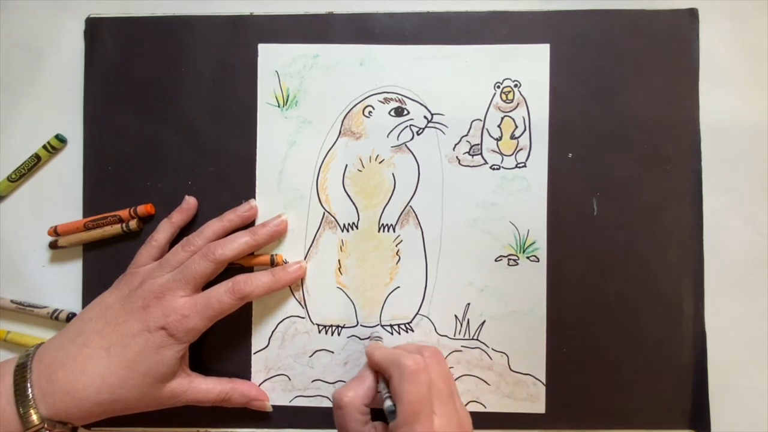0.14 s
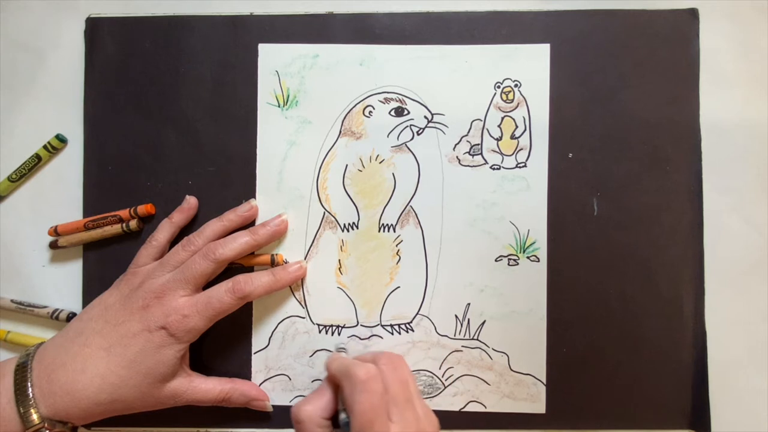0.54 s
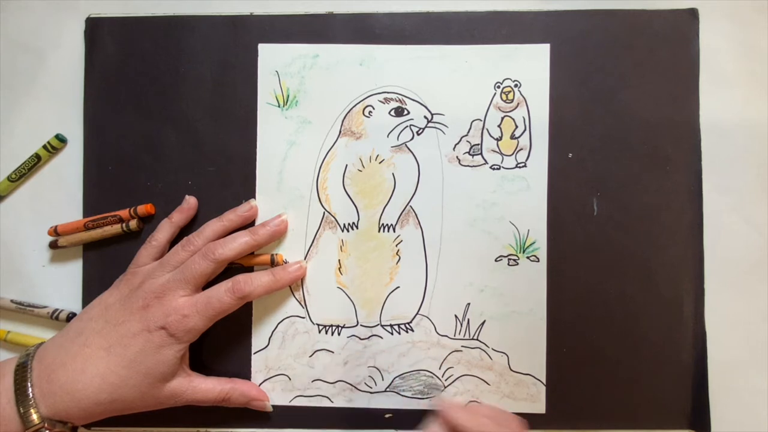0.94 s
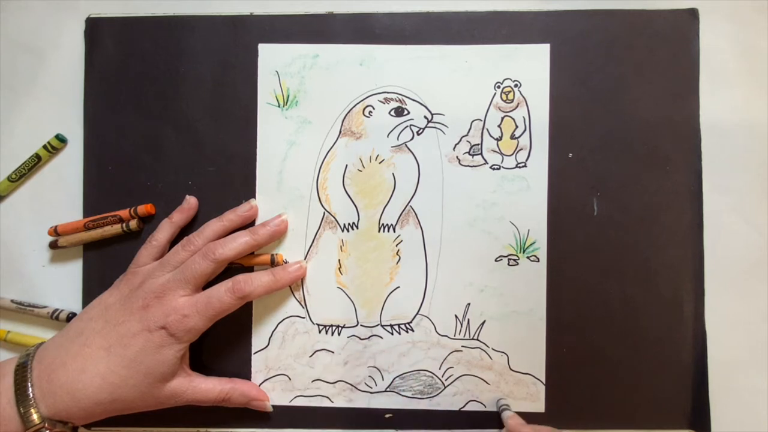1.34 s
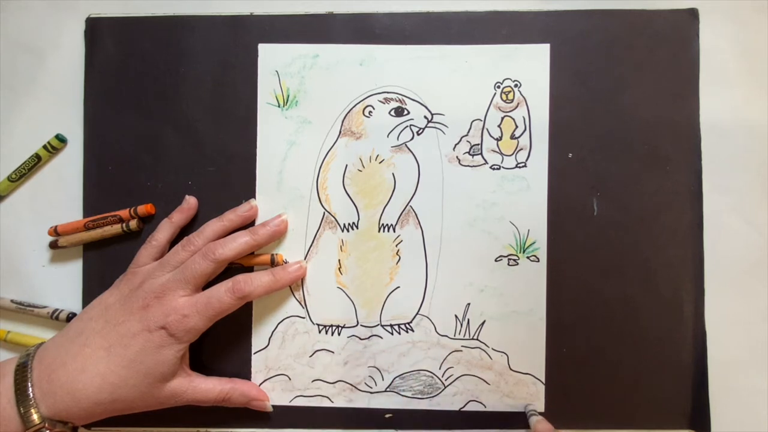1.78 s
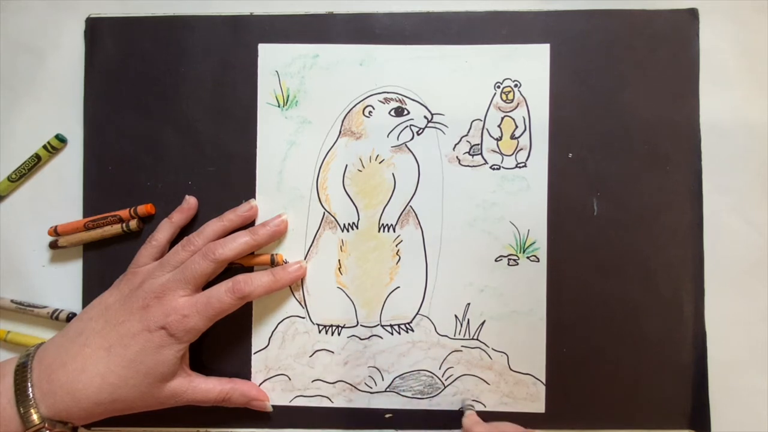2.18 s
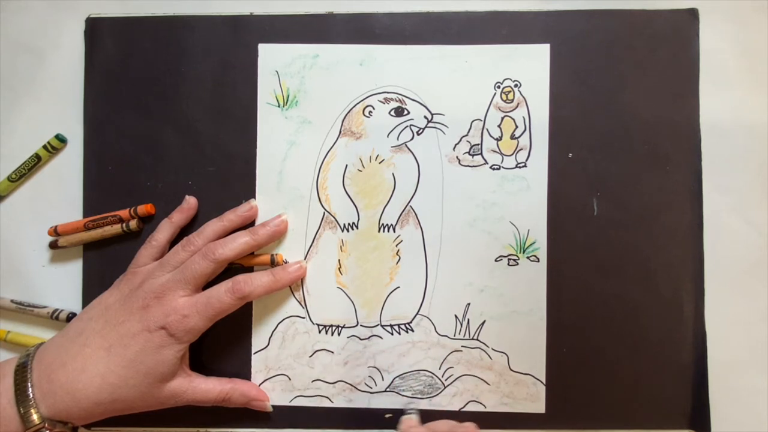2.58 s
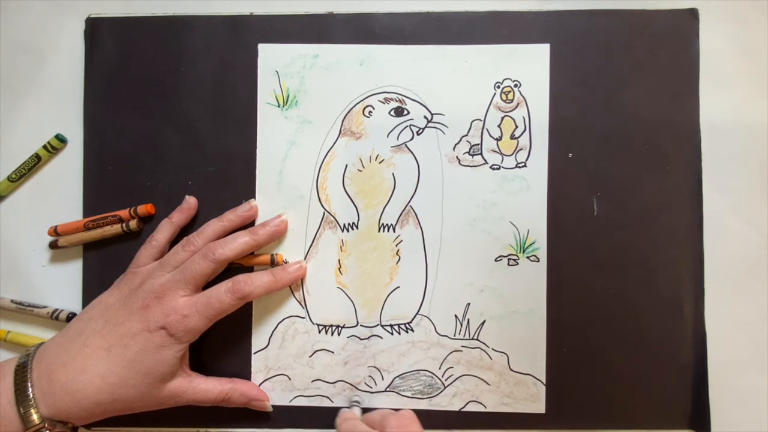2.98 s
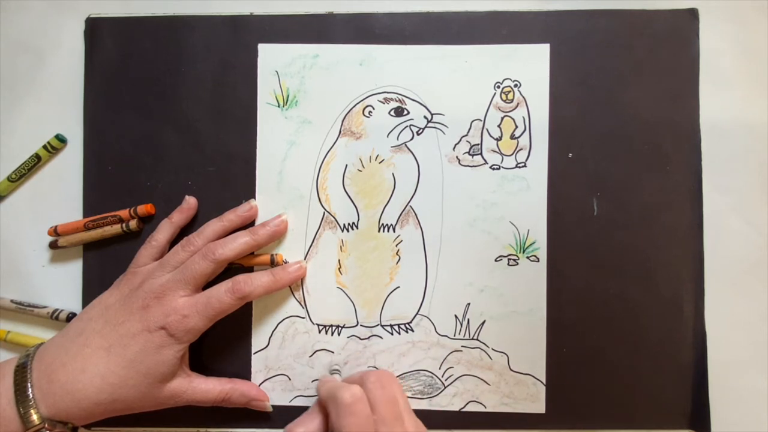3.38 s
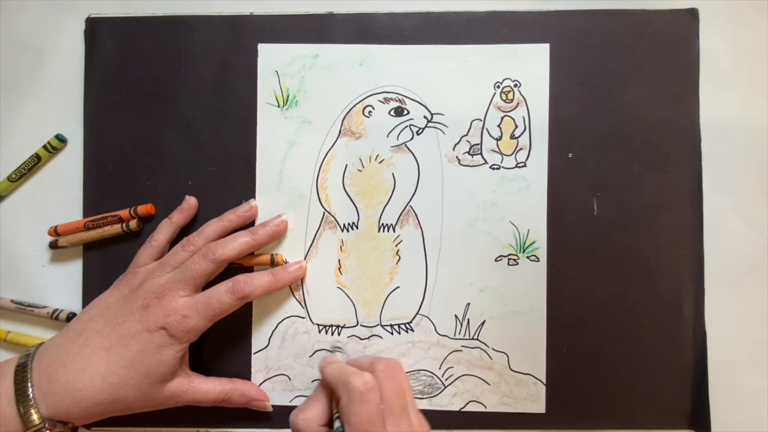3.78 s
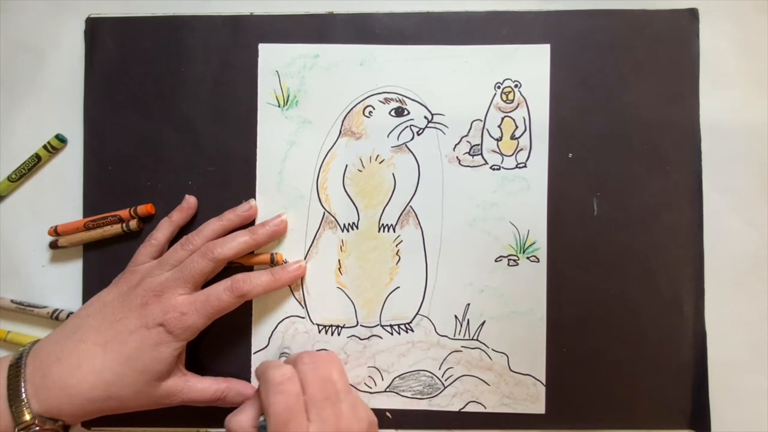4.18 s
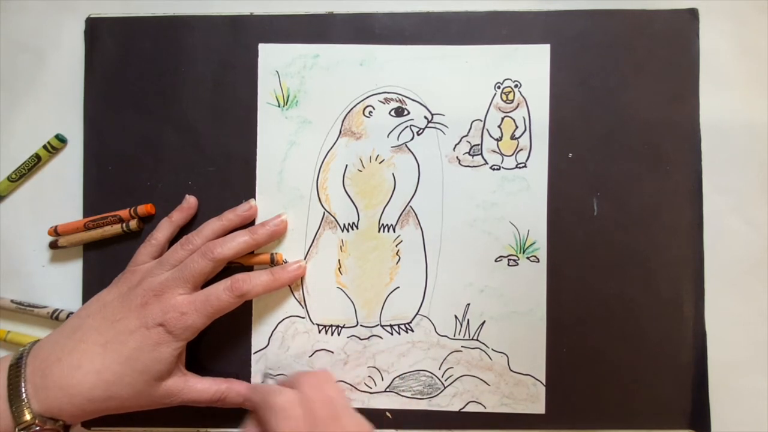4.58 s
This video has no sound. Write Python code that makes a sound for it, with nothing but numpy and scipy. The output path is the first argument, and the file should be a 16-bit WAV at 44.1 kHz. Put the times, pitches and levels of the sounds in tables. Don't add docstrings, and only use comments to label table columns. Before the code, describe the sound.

Close, mono-sounding view of a hand colouring at a wooden table: faint grainy scratching in uneven bursts, the palm's heel sliding thinly on paper, and boomy muffled thumps as tip and knuckles land. The microphone stand wobbles with very deep rumble. Strokes thin out near one second, then run almost continuously, with a crisp tick just after four seconds over quiet room tone and faint lamp buzz.

```python
import sys
import numpy as np
from scipy import signal
from scipy.fft import rfft, irfft
from scipy.io import wavfile

SR = 44100
rng = np.random.default_rng(int(sys.argv[2]) if len(sys.argv) > 2 else 0)


def persist_wave(psi):
    counts = np.round(np.clip(psi, -1, 1) * 32767).astype(np.int16)
    wavfile.write(sys.argv[1], SR, np.atleast_2d(counts).T)


def volts_from_db(level):
    exponent = np.asarray(level, float) / 20
    return 10 ** exponent


N = 208989

# (time [s], board level [dB], frame level [dB], knock level [dB])
THUD_EVENTS = [(0.0, -51.5, -47, -74), (.0875, -31.5, -32, -44.5), (.244, -60, -52, -58.5),
               (.6243, -28.5, -29.5, -43), (.849, -57.5, -55, -68), (1.086, -56, -62, -61),
               (1.177, -82, -62, -73), (1.2648, -33, -33, -48.5), (1.691, -37, -35, -56.5),
               (2.08, -34.5, -35.5, -50.5), (2.636, -67, -64, -66.5), (2.746, -53.5, -42, -69.5),
               (2.899, -46.5, -55, -71), (3.219, -45, -41.5, -65), (3.3283, -36, -32, -50),
               (3.458, -53, -73, -63.5), (3.905, -54, -57.5, -70.5), (4.073, -51.5, -44.5, -59.5),
               (4.274, -54.5, -70, -71), (4.356, -61, -48.5, -68), (4.548, -69, -53, -64.5),
               (4.646, -83, -84, -69.5)]
# (frequency [Hz], level [dB], t60 [s])
FRAME_MODES = [(45.16, -1, 0.31), (56.3, -2.5, 0.078), (90.5, -19, 0.38), (104, -14.5, 0.52)]
# (frequency [Hz], level [dB], t60 [s])
BOARD_MODES = [(145, -31.5, 0.38), (216, -15.5, 0.43), (231.2, 1.5, 0.091), (270.5, 7.5, 0.028),
               (314.3, -4.5, 0.1), (342.8, -12.5, 0.11), (375, -18, 0.35)]
# (frequency [Hz], level [dB], t60 [s])
KNOCK_MODES = [(538, -10, 0.056), (634, 4.5, 0.037), (714, 3, 0.037), (754.6, 4, 0.045), (837, -22, 0.14),
               (906, -19.5, 0.15), (1086, -19, 0.17), (1193, -25, 0.12), (1294, -16.5, 0.073)]
# (start [s], length [s], board level [dB], knock level [dB])
PRESSURE_SWELLS = [(0.0, 0.7, -67.5, -66), (0.17, 0.063, -63.5, -82), (0.31, 0.16, -71, -82),
                   (0.55, 0.36, -70, -69.5), (0.68, 0.16, -81, -78), (1.07, 0.079, -68.5, -62),
                   (1.16, 0.061, -69, -69.5), (1.27, 0.098, -57, -70), (1.41, 0.25, -69.5, -74.5),
                   (1.68, 0.16, -63, -74), (1.8, 0.21, -61, -71.5), (2.08, 0.16, -63, -71),
                   (2.18, 0.17, -66.5, -69.5), (2.41, 0.18, -65.5, -70), (2.62, 0.046, -79, -80),
                   (2.74, 0.1, -70.5, -78), (2.83, 0.059, -88, -63.5), (2.88, 0.17, -62.5, -70),
                   (2.96, 0.16, -64.5, -57.5), (3.2, 0.16, -79, -84), (3.33, 0.16, -66, -63.5),
                   (3.43, 0.2, -66, -73.5), (3.55, 0.27, -65, -66), (4.05, 0.18, -70.5, -72),
                   (4.17, 0.098, -67.5, -68.5), (4.25, 0.096, -66, -75), (4.335, 0.12, -71, -77),
                   (4.44, 0.13, -66, -71.5), (4.63, .09, -70.5, -87)]
# (time [s], level [dB])
STAND_ROCKING = [(0.0, -21.5), (0.05, -52.5), (0.17, -31.5), (0.32, -41.5), (0.5, -37), (0.8, -42.5),
                 (1.1, -44.5), (1.7, -48), (1.86, -25.5), (1.99, -34), (2.1, -22.5), (2.23, -46.5),
                 (2.32, -33.5), (2.57, -32.5), (2.69, -43), (2.95, -37.5), (3.6, -42.5), (4.74, -47)]
# (frequency [Hz], density [dB per Hz])
FLOOR_SPECTRUM = [(35, -24), (60, 9), (66, -2.5), (112, -19), (248, -21), (629, -30.5), (724, -27),
                  (1920, -32.5), (2730, -32), (3210, -38.5), (3960, -35), (15600, -34)]
# (start [s], length [s], hiss level [dB], bright top level [dB])
STROKE_SWELLS = [(0.05, 0.16, -65, -76), (0.2, .125, -68.5, -80), (0.325, .16, -65, -72.5),
                 (0.46, 0.37, -73, -83), (0.745, 0.14, -62.5, -73), (1.275, 0.13, -65.5, -80),
                 (1.405, 0.083, -72, -86), (1.47, .08, -69, -73), (1.54, 0.11, -75.5, -80),
                 (1.735, 0.3, -66, -75.5), (2.01, 0.18, -69, -76), (2.17, .13, -64, -78),
                 (2.26, 0.17, -71, -80), (2.39, 0.17, -69, -74.5), (2.55, .16, -63.5, -65),
                 (2.7, 0.32, -68.5, -74.5), (2.94, 0.21, -65, -71), (3.12, 0.24, -66, -69.5),
                 (3.27, 0.21, -66.5, -75), (3.44, .17, -66, -75), (3.615, 0.14, -67, -80),
                 (3.75, 0.082, -71.5, -79), (3.86, 0.15, -78, -76.5), (3.99, 0.12, -67, -82),
                 (4.06, 0.13, -63.5, -78), (4.15, 0.29, -72.5, -80), (4.425, 0.16, -68, -85),
                 (4.515, .1, -68, -79), (4.625, 0.075, -79, -90)]
# (frequency [Hz], width [Hz], level [dB])
PAPER_RESONANCES = [(1800, 330, -7.5), (2350, 2400, -10), (3365, 250, 1), (3640, 170, 1.5),
                    (3892, 415, 1.5), (4415, 510, -0.5), (5250, 1030, -2.5), (7230, 1600, -13)]
# (start [s], length [s], slide level [dB], shove level [dB])
HEEL_SLIDES = [(0.05, 0.52, -71.5, -54), (0.5, 0.41, -79.5, -55), (1.3, 0.61, -81, -72),
               (1.75, 0.32, -74, -70), (2.1, 0.83, -73, -64), (2.55, 0.62, -78, -64), (2.88, 0.2, -73, -45),
               (3.0, 0.41, -79, -56), (3.6, 0.24, -87, -44.5), (4.0, 0.34, -78, -70),
               (4.29, 0.096, -87.5, -47)]
# (frequency [Hz], width [Hz], level [dB])
SHEET_RESONANCES = [(3400, 95, -0.5), (3766, 230, -0.5), (4530, 170, -6.5)]
# (time [s], peak level [dB], low edge [Hz], high edge [Hz], t60 [s])
TICK_EVENTS = [(0.084, -49.5, 5000, 9250, 0.0051), (0.0893, -58, 1520, 3500, 0.045),
               (.248, -60.5, 900, 2500, .02), (0.623, -52.5, 2500, 9000, 0.0098),
               (0.628, -56, 1500, 5060, 0.033), (.853, -64, 1030, 2490, 0.04),
               (0.976, -65, 2400, 3000, 0.012), (1.089, -60, 3030, 4100, 0.045),
               (1.089, -62, 885, 2600, 0.081), (1.267, -54.5, 1130, 4380, 0.035),
               (1.2675, -63, 6000, 8500, 0.0068), (1.978, -54.5, 2000, 2980, 0.018),
               (2.0645, -48, 3500, 8800, 0.01), (2.0695, -46.5, 5950, 7860, 0.012),
               (2.082, -55, 2900, 4760, 0.011), (3.331, -84, 900, 1570, 0.031),
               (4.231, -67, 900, 2000, .02), (4.369, -71, 885, 1800, .02), (3.898, -66, 5930, 8900, 0.032),
               (4.081, -38, 2700, 4050, 0.02), (4.081, -53, 940, 3150, 0.043)]
# (start [s], length [s], start pitch [Hz], end pitch [Hz], level [dB])
SQUEAK_EVENTS = [
    (0.452, 0.052, 1950, 1800, -67.5),
    (0.477, 0.031, 2030, 1760, -74),
]


def rms_one(x):
    return x / np.sqrt(np.mean(x ** 2) + 1e-20)


def band(x, low_hz, high_hz):
    edges_hz = [low_hz, min(high_hz, SR / 2.2)]
    return signal.sosfilt(signal.butter(2, edges_hz, "band", fs=SR, output="sos"), x)


def low_pass(x, cut_hz):
    return signal.sosfilt(signal.butter(2, cut_hz, fs=SR, output="sos"), x)


def decay(x, t60_s):
    return signal.lfilter([1], [1, -volts_from_db(-60 / (t60_s * SR))], x)


def drift(rate_hz):
    r = np.exp(-2 * np.pi * rate_hz / SR)
    wander = signal.lfilter([1], [1, -2 * r, r * r], rng.standard_normal(N + SR))
    return rms_one(wander[SR:])


def ring(force, hz, t60_s):
    r = volts_from_db(-60 / (t60_s * SR))
    w = 2 * np.pi * hz / SR
    return signal.lfilter([0, np.sin(w)], [1, -2 * r * np.cos(w), r * r], force + 1e-18)


def peak(x, hz, width_hz):
    r = np.exp(-np.pi * width_hz / SR)
    poles = [1, -2 * r * np.cos(2 * np.pi * hz / SR), r * r]
    return signal.lfilter([(1 - r * r) / 2, 0, (r * r - 1) / 2], poles, x)


def grain(per_s, spread_db):
    size_db = spread_db * np.minimum(rng.exponential(1, N), 5)
    slips = volts_from_db(size_db) * rng.choice([-1, 1], N)
    return rms_one(slips * (rng.random(N) < per_s / SR))


def swells(rows, peak_at, sharpness):
    t = np.arange(N) / SR
    rest_db = -84.5
    power = volts_from_db(2 * rest_db)
    bend = np.log(0.5) / np.log(np.clip(peak_at, 0.2, 0.8))
    for start_s, length_s, *level_db in rows:
        phase = np.clip((t - start_s) / length_s, 0, 1) ** bend
        speed = np.sin(np.pi * phase).clip(0) ** sharpness
        power = power + (volts_from_db(level_db)[:, None] * speed) ** 2
    return 10 * np.log10(power)


def blows(column, delay_s, bounce=0):
    rows, clicks = np.array(THUD_EVENTS), np.zeros(N)
    clicks[((rows[:, 0] + delay_s) * SR).astype(int)] = volts_from_db(rows[:, column])
    bounce_s = 0.00332
    return clicks + bounce * np.roll(clicks, int(bounce_s * SR))


def thuds(legs_s):
    contact_s, settle_s = 0.00035, 0.002806
    rattle_t60_s, rattle_gain = 0.064, 0.05
    hit = blows(1, settle_s, 0.37)
    board = sum(volts_from_db(db - 10.5) * ring(hit, hz, t60_s) for hz, db, t60_s in BOARD_MODES)

    late_hit = blows(2, settle_s + legs_s)
    frame = -sum(volts_from_db(db + 5.5) * ring(late_hit, hz, t60_s) for hz, db, t60_s in FRAME_MODES)
    frame = low_pass(frame, 70)

    sharp_hit = blows(3, settle_s, volts_from_db(-4))
    rattle = decay(sharp_hit, rattle_t60_s) * rng.standard_normal(N)
    force = sharp_hit + rattle_gain * rattle
    knock = sum(volts_from_db(db - 5.5) * ring(force, hz, t60_s) for hz, db, t60_s in KNOCK_MODES)

    heavy = low_pass(board + frame, 750)
    contact = np.hanning(int(contact_s * SR))
    return signal.lfilter(contact / contact.sum(), [1], heavy + knock)


def wobble(board_db, shove_db, legs_s):
    after = decay(blows(2, legs_s), 0.34)
    after = low_pass(after, 28.3).clip(0)
    return 20 * np.log10(volts_from_db(-3) * after + volts_from_db(board_db + 9) + volts_from_db(shove_db))


def driven(force, modes, low_hz, high_hz):
    return rms_one(sum(volts_from_db(db) * np.sqrt(t60_s) * rms_one(band(ring(force, hz, t60_s), low_hz, high_hz))
                       for hz, db, t60_s in modes))


def rubbing(board_db, knock_db, wobble_db):
    drag = grain(2500, 2.0) * volts_from_db(1.8 * drift(14))
    board = driven(drag, BOARD_MODES, 100, 530)
    knock = driven(drag, KNOCK_MODES, 510, 1310)
    push = rng.standard_normal(N)
    frame = sum(volts_from_db(db) * rms_one(band(ring(push, hz, t60_s), 30, 120)) for hz, db, t60_s in FRAME_MODES)
    rub = volts_from_db(board_db - 0.83) * board + volts_from_db(knock_db - 2.4) * knock
    return rub + volts_from_db(wobble_db - 8.0) * rms_one(frame)


def sway():
    time_s, level_db = np.transpose(STAND_ROCKING)
    sway_db = np.interp(np.arange(N) / SR, time_s, level_db)
    rate_hz = 12.5 + 2.0 * drift(1.0)
    turn = 2 * np.pi * np.cumsum(rate_hz) / SR
    return volts_from_db(sway_db + 4.5) * (np.sin(turn) + 0.18 * np.sin(2 * turn + 0.8))


def room_floor():
    floor_db, buzz_db, buzz_hz = -69.5, -88, 119.83
    hz = np.maximum(np.fft.rfftfreq(N, 1 / SR), 1)
    point_hz, point_db = np.transpose(FLOOR_SPECTRUM)
    colour = volts_from_db(np.interp(np.log(hz), np.log(point_hz), point_db)) * (hz > 50)
    tone = irfft(rfft(rng.standard_normal(N)) * colour, N)
    tone = tone / np.std(band(tone, 85.5, 12000))
    sparks = np.diff(np.floor(np.arange(N + 1) * buzz_hz / SR))
    buzz = rms_one(band(sparks, 13900, 15200))
    return volts_from_db(floor_db) * tone + volts_from_db(buzz_db) * buzz


def hiss(hiss_db, top_db):
    slips = grain(9000, 1.8)
    body = np.zeros(N)
    for k, (hz, width_hz, db) in enumerate(PAPER_RESONANCES):
        body += (-1) ** k * volts_from_db(db + 1.2 * drift(6)) * peak(slips, hz, width_hz)
    top = band(grain(12000, 2.4), 5000, 13500)
    uneven = volts_from_db(1.0 * drift(25))
    return uneven * (volts_from_db(hiss_db + 0.88) * rms_one(body) + volts_from_db(top_db - 0.2) * rms_one(top))


def slide(slide_db):
    rub = grain(6000, 1.8)
    uneven_db = 1.5 * drift(6)
    sheet = sum(volts_from_db(db) * peak(rub, hz, width_hz) for hz, width_hz, db in SHEET_RESONANCES)
    return volts_from_db(slide_db + uneven_db) * rms_one(sheet)


def ticks():
    out, t = np.zeros(N), np.arange(SR // 10) / SR
    for time_s, db, low_hz, high_hz, t60_s in TICK_EVENTS:
        at = int(time_s * SR)
        crackle = rms_one(band(rng.standard_normal(len(t)), low_hz, high_hz))
        burst = crackle * volts_from_db(db - 60 * t / t60_s)
        out[at:at + len(t)] += band(burst, low_hz, high_hz)
    return out


def squeaks():
    out, slips = np.zeros(N), grain(1600, 2.0)
    for start_s, length_s, from_hz, to_hz, db in SQUEAK_EVENTS:
        at, size = int(start_s * SR), int(length_s * SR)
        force = slips[at:at + size]
        upper = rms_one(peak(peak(force, from_hz, 300), from_hz, 300))
        lower = rms_one(peak(peak(force, to_hz, 300), to_hz, 300))
        turn = np.linspace(0, 1, size)
        fall = (1 - turn) * upper + turn * lower
        out[at:at + size] += volts_from_db(db) * fall * np.sqrt(np.hanning(size))
    return out


def scene():
    legs_s = 0.0031
    board_db, knock_db = swells(PRESSURE_SWELLS, peak_at=0.39, sharpness=1.42)
    slide_db, shove_db = swells(HEEL_SLIDES, peak_at=0.45, sharpness=0.59)
    hiss_db, top_db = swells(STROKE_SWELLS, peak_at=0.42, sharpness=1.0)
    table = thuds(legs_s) + rubbing(board_db, knock_db, wobble(board_db, shove_db, legs_s))
    crayon = hiss(hiss_db, top_db) + slide(slide_db) + ticks() + squeaks()
    return (table + sway() + room_floor() + crayon)[None, :]


def top_cut(x):
    return signal.sosfilt(signal.butter(12, 15760, fs=SR, output="sos"), x)


def record(dry):
    return top_cut(dry)


dry = scene()
out = record(dry)
persist_wave(out)
```